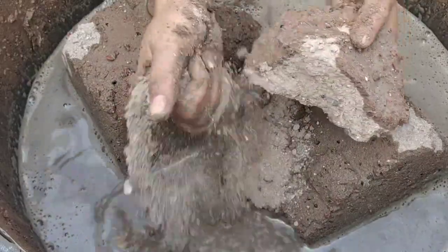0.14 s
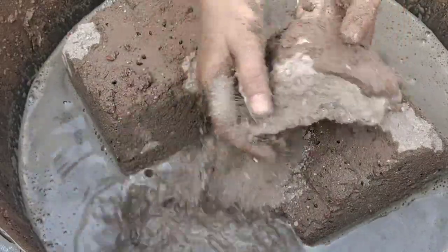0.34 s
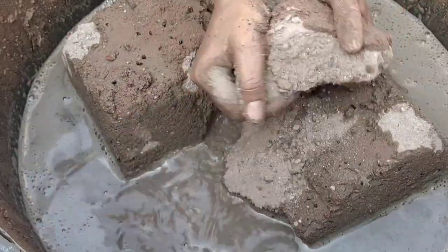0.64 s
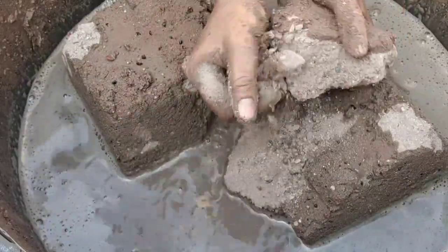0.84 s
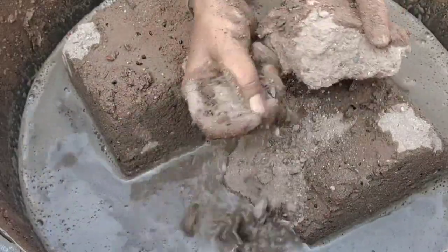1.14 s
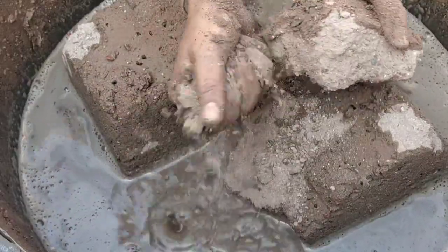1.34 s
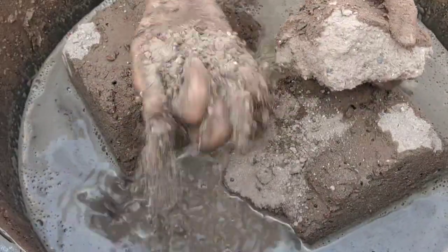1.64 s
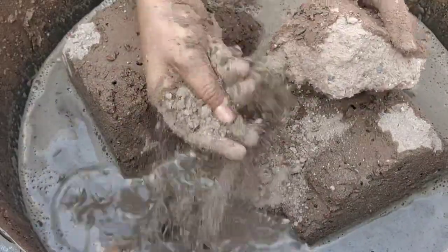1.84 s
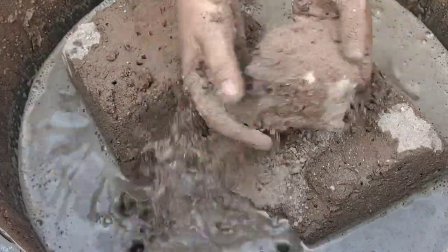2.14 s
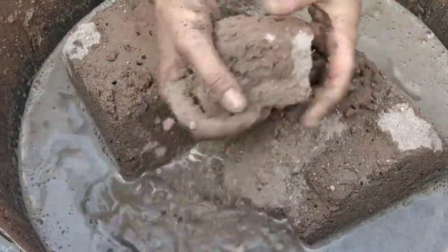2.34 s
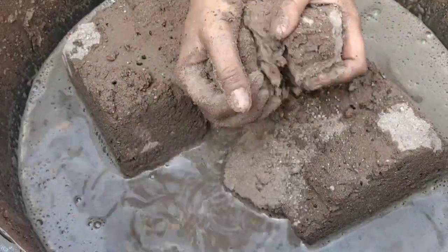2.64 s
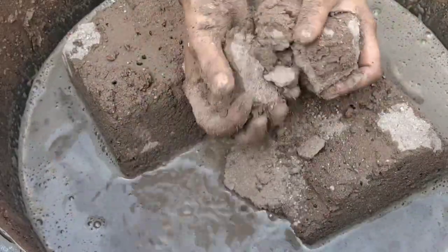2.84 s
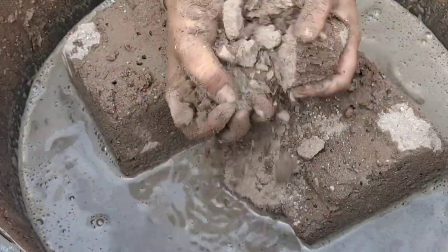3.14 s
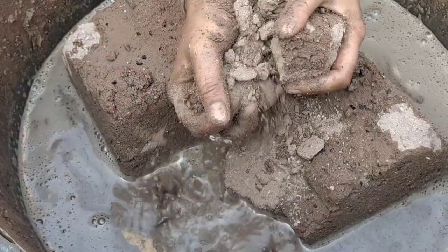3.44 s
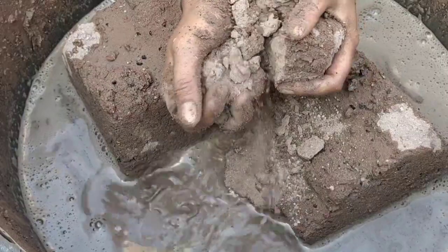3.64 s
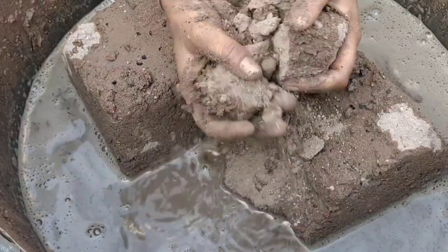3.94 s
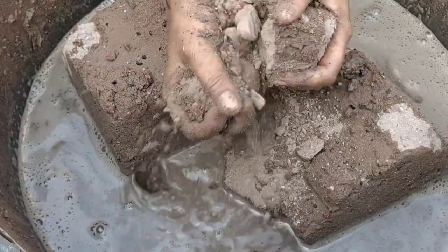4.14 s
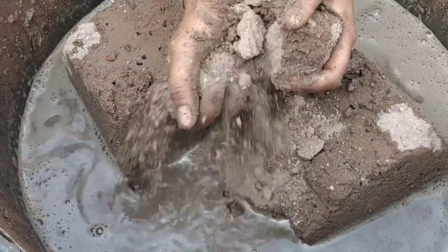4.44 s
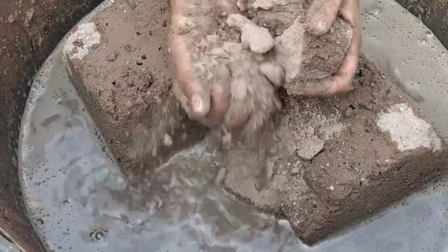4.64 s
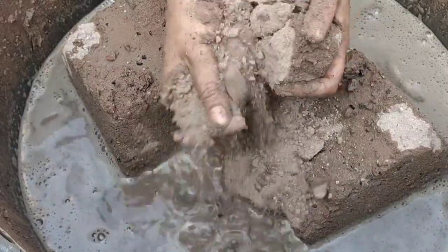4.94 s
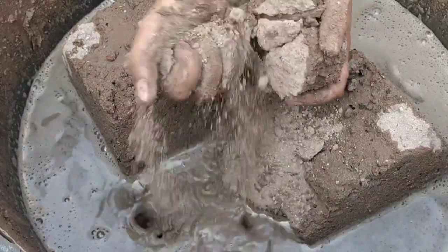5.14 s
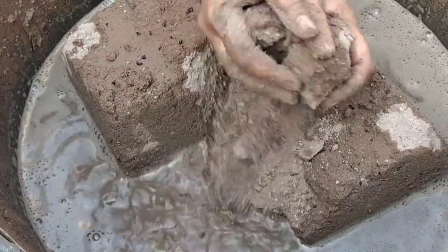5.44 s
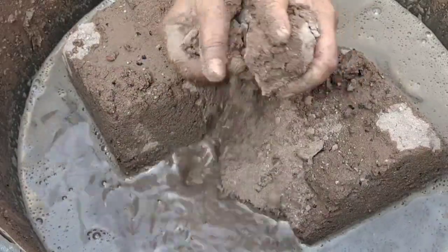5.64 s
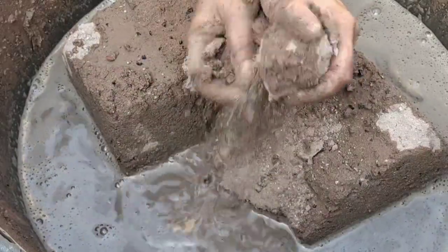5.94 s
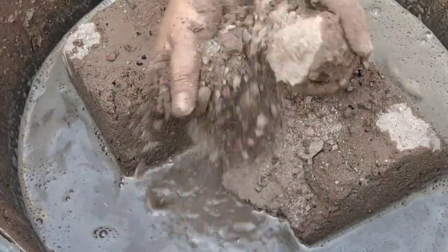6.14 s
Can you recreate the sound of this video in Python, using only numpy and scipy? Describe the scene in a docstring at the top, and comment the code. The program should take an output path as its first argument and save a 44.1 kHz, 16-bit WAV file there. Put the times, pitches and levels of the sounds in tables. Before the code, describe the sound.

Gritty squeezing comes in irregular bursts, a few per second at most, with quieter shifting of sand between. Each burst crackles, then sheds crumbs that tick, splash and bloop into a shallow tub of water. Heavier lumps knock softly around two seconds, again just after four and near five. Very close, detailed, mono outdoor sound with short boxy resonance and faint bass rumble.

```python
"""Outdoors, over a tub of muddy water, two hands crush a damp sand-cement block close to the microphone.
Squeezed sand hisses and crunches as filtered swarms of tiny impacts; grit snaps as short noise bursts.
Crumbs plop into the water as ringing bubbles, and larger lumps thud onto the soaked blocks below
as pressure pulses with spray. Resonances make the tub ring briefly after each; a low rumble lies beneath."""
import sys
import numpy as np
from scipy import signal
from scipy.fft import rfft, irfft, next_fast_len
from scipy.io import wavfile
from scipy.ndimage import map_coordinates

SR = 44100
rng = np.random.default_rng(int(sys.argv[2]) if len(sys.argv) > 2 else 0)


def put_to_file(sound):
    """Save the sound as 16-bit audio at rate SR, in the file named by the first command-line argument."""
    columns = np.atleast_2d(sound).T  # one column per channel
    safe = np.clip(columns, -1, 1)
    whole_steps = np.round(safe * 32767)
    wavfile.write(sys.argv[1], SR, whole_steps.astype(np.int16))


N = 277830

# Levels in these tables are relative: fixed offsets and the tub act on them later.
# spectrum of the low outdoor rumble: (frequency [Hz], level [dB])
AIR_SPECTRUM = [(13, -46), (22, -30), (38, -9.5), (123, 1), (142, 3), (187, -12), (254, -3), (335, -12),
                (467, -6.5), (597, -19), (700, -13.5), (910, -43), (1540, -120)]
# resonances of the hollow of the tub: (frequency [Hz], gain [dB], 60 dB decay time [s])
TUB_MODES = [(189, 1.5, 0.086), (502, 0, 0.044), (857, -2, 0.038), (1170.5, 4.5, 0.09), (1512, -8.5, 0.03)]
# handfuls raining on the water: (start [s], end [s], crumb level [dB], wet sand level [dB])
HANDFULS = [(0.0, 0.298, -23, -47), (.35, 0.499, -16.5, -41.5), (1.199, 1.619, -27, -46),
            (1.679, 1.751, -17, -45), (1.83, 1.953, -21.5, -47.5), (2.001, 2.371, -26.5, -48.5),
            (3.288, 3.679, -28.5, -55), (4.141, 4.448, -26.5, -50), (4.6, 4.72, -20, -48),
            (4.889, 5.168, -30, -48.5), (5.197, 5.304, -16, -44.5), (5.425, 5.649, -22, -46.5),
            (5.706, 6.277, -34.5, -45.5)]
# spectrum of water slapped by crumbs: (frequency [Hz], level [dB])
SPLASH_SPECTRUM = [(300, -6.5), (1200, -1.5), (3200, -2), (4800, -10.5), (14000, -18.5)]
# larger crumbs trapping a bubble: (time [s], level [dB], starting pitch [Hz], 60 dB decay time [s])
BUBBLE_CRUMBS = [(0.0448, -23.5, 1495, 0.045), (.29, -21, 1720, 0.015), (0.312, -19, 1670, 0.018),
                 (0.3355, -23.5, 1520, 0.025), (0.3661, -22, 1680, .02), (.392, -18.5, 1570, 0.027),
                 (0.4062, -22, 1073, 0.045), (0.4275, -15, 2470, 0.0046), (0.4737, -18, 2300, .006),
                 (0.505, -25, 1310, 0.017), (1.0262, -30, 1870, 0.017), (1.1215, -26, 2140, 0.016),
                 (1.1843, -11, 945, .026), (1.1956, -15.5, 1210, 0.0074), (1.2877, -16, 1530, 0.0085),
                 (1.3904, -20.5, 910, 0.011), (1.6108, -17.5, 1550, .008), (1.669, -22.5, 1305, 0.046),
                 (1.7345, -12, 1820, 0.018), (1.748, -18, 2350, 0.012), (1.8366, -23, 2800, .006),
                 (1.8504, -25, 1760, .015), (1.9124, -14.5, 2550, 0.0037), (2.1423, -16.5, 1700, .017),
                 (2.1937, -13.5, 1350, 0.0033), (2.203, -22.5, 1840, .019), (2.2327, -22, 1340, .008),
                 (2.2654, -17, 3200, 0.0071), (2.3188, -20.5, 1270, 0.026), (2.3407, -17, 1660, .006),
                 (2.3722, -9.5, 1980, 0.005), (2.656, -23.5, 1880, 0.0043), (2.7451, -21.5, 1187, 0.027),
                 (3.061, -35.5, 1610, 0.026), (3.3022, -25, 1157, .038), (3.4087, -26, 885, 0.015),
                 (3.4466, -18, 1610, 0.0053), (3.4627, -18, 1700, 0.0042), (3.5079, -16.5, 1880, 0.01),
                 (3.5596, -18, 1230, 0.01), (3.6494, -28, 1670, 0.028), (4.1602, -18, 1950, 0.0076),
                 (4.329, -19.5, 1930, 0.018), (4.4189, -13.5, 1840, 0.0068), (4.441, -32.5, 1156, 0.041),
                 (4.6494, -17, 1620, 0.0082), (4.679, -18, 3220, .004), (4.8322, -18.5, 1500, 0.006),
                 (4.911, -18, 1970, 0.015), (4.9667, -20.5, 3760, 0.014), (5.1317, -18, 1700, 0.02),
                 (5.2524, -25, 1182, .043), (5.378, -23, 840, 0.011), (5.3929, -13, 3250, 0.0044),
                 (5.4615, -18.5, 1440, .024), (5.4955, -20, 1010, .031), (5.5277, -19, 2430, 0.0043),
                 (5.5655, -20.5, 2210, 0.011), (5.5935, -26, 1490, 0.021), (5.6314, -19.5, 1850, 0.012),
                 (5.941, -20, 1170, 0.0096)]
# lumps landing, lower for a big soft lump: (time [s], level [dB], centre [Hz], splatter [dB re level])
LUMP_LANDINGS = [(1.1842, -27, 890, 6), (1.2636, -12.5, 900, -20), (1.7527, -7, 2620, -17),
                 (1.7548, -11.5, 1110, -12), (1.8741, -21, 1010, -17), (1.9405, -14, 1010, -9),
                 (1.9471, -11, 1240, -4.5), (2.0022, -16.5, 990, -7), (4.1242, -5, 714, -13),
                 (4.125, -14, 1510, -26), (4.183, -27.5, 700, 4), (4.2499, -30, 860, 9),
                 (4.989, -12, 1185, -2.5), (4.993, -19.5, 400, -2)]
# loudest grits cracking or striking: (time [s], level [dB], treble [dB re level])
LOUD_GRITS = [(.4004, -6, -28), (.443, -14, -15), (1.3264, -18, -8), (1.61, -18, -9), (1.6901, -19, -9),
              (1.7107, -14, -11), (1.7348, -20, -16), (1.7524, -14, -11), (1.8707, -15, -7.5),
              (1.9457, -11, -20), (1.9606, -19, -6), (2.003, -3, -19.5), (2.3184, -17.5, -8),
              (2.383, -9.5, -15), (2.436, -13, -22), (2.4848, -14.5, -19), (3.4005, -22, -5),
              (3.4456, -20, -9), (3.552, -16, -8), (3.585, -15.5, -10.5), (4.05, -26, -12),
              (4.4194, -22, -9), (4.566, -18, -13), (4.6082, -11, -13.5), (4.9541, -14, -12),
              (4.9889, -7.5, -18), (5.2158, -9, -17), (5.2873, -17.5, -9.5), (5.3911, -11, -21.5),
              (5.4435, -17, -6.5), (5.4932, -17, -13)]
# pockets of sand giving way in the fist: (time [s], level [dB])
COLLAPSES = [(0.097, -32), (.828, -40.5), (1.261, -30), (1.329, -32.5), (3.233, -34), (3.358, -31.5),
             (3.555, -35.5), (3.583, -30), (4.112, -36), (4.29, -32), (4.367, -27), (5.466, -31.5),
             (5.905, -31), (6.046, -35.5), (6.106, -38), (6.237, -32.5)]
# spectrum of a collapsing pocket, also used for lump spray: (frequency [Hz], level [dB])
CRUNCH_SPECTRUM = [(120, -26), (220, -1), (650, -1), (900, -4), (2000, 2), (3000, -2), (4800, 3),
                   (7500, -9.5), (10500, -10.5), (15500, -32.5)]
# the fist closing on the sand: (start [s], end [s], level [dB], swell from start to end [dB])
FIST_SQUEEZES = [(0.0, 0.268, -41.5, -3), (0.37, 0.504, -41, -3.5), (0.52, 0.72, -48, 6),
                 (0.719, 0.824, -39.5, 6), (0.957, 1.065, -50.5, -2), (1.175, 1.556, -40, -1),
                 (1.574, 1.738, -42.5, -2), (1.87, 1.947, -44, 7), (1.986, 2.088, -43, -1),
                 (2.182, 2.384, -42.5, -3), (2.621, 2.806, -46, 6), (2.92, 3.116, -52.5, -8),
                 (3.178, 3.474, -45, 0), (3.521, 3.72, -42, -3.5), (3.888, 3.99, -54, -10),
                 (4.067, 4.442, -42, -0.5), (4.474, 4.73, -43.5, 1.5), (4.855, 5.338, -44, 4),
                 (5.44, 5.645, -50, 9), (5.654, 5.739, -39, 7.5), (5.84, 6.28, -41, 5)]
# spectrum of rubbing sand: (frequency [Hz], level [dB])
SAND_SPECTRUM = [(250, -17), (900, -3.5), (2000, -11.5), (2700, -6.5), (4000, 0), (5000, 0.5), (6200, -3.5),
                 (7600, -9.5), (10600, -8.5), (13000, -14.5), (15500, -19.5)]
# spectrum of wet sand: (frequency [Hz], level [dB])
MUD_SPECTRUM = [(120, -54), (220, 0), (450, -7), (650, -5), (860, -4.5), (1400, -0.5), (2000, 5),
                (2800, -4.5), (5000, -11.5), (12000, -21.5)]

TOP_HZ = 15750  # upper band limit of the microphone
POUR_S, DRAIN_S = 0.027, 0.078  # a shower builds up; time constant as its patter dies away
STRAY_DB, CRUMB_RANGE_DB = -31, 16  # strongest stray crumb; spread of crumb levels below the strongest
# every lump slumps just after landing: delay [s], level [dB] and pitch ratio relative to the landing
SLUMP_S, SLUMP_DB, SLUMP_PITCH = 0.003045, -8, 0.438
# lesser grits: strongest level over the rubbing, spread below it, treble relative to each
GRIT_DB, GRIT_RANGE_DB, GRIT_TREBLE_DB = 19.5, 14, -11
CRUNCH_S = 0.01  # half the length of one collapse
GRIP_S, RELAX_S = 0.013, 0.027  # the fingers tighten; time constant as the rubbing dies away
HOLD_DB, HOLD_WAVER_DB = -50, 1.5  # sand shifting in the resting hands; depth of its random waver
SQUELCH_DB = -9.5  # mud pressed out between the fingers, relative to the rubbing


def amp(db):
    """Amplitude gain: twenty decibels are a factor of ten."""
    return 10 ** (np.asarray(db) / 20)


def unit(x):
    """Normalise by mean power, to rms 1."""
    return x / np.sqrt(np.mean(x ** 2) + 1e-20)


def clock(seconds):
    """Uniform sampling: the sample times [s] of a short sound."""
    return np.arange(int(seconds * SR)) / SR


def add(track, s, sound):
    """Superposition: mix a sound into the track from time s [s]."""
    start = max(round(s * SR), 0)
    part = track[start:start + len(sound)]
    part += sound[:len(part)]


def wobble(rate):
    """Random modulation: a smooth curve through Gaussian knots, rate of them a second."""
    knots = rng.standard_normal(int(N * rate / SR) + 4)
    return map_coordinates(knots, [np.arange(N) * rate / SR])


def coloured(x, points):
    """Spectral shaping: weight x by (frequency [Hz], level [dB]) points, at rms 1."""
    hz, db = np.transpose(points)
    size = next_fast_len(N + 8192)
    f = np.fft.rfftfreq(size, 1 / SR)
    gain = amp(np.interp(np.log(f + 1), np.log(hz), db, left=-80))
    return unit(irfft(rfft(x, size) * gain, size)[:N])


def bandpass(x, low_hz, high_hz):
    """Resonance: pass one band of frequencies."""
    return signal.sosfilt(signal.butter(2, [low_hz, high_hz], "band", fs=SR, output="sos"), x)


def swell(start, end, attack, release):
    """Envelope: a linear rise centred on start, a hold until end, then exponential decay."""
    t = np.arange(N) / SR
    rise = np.clip((t - start) / attack + .5, 0, 1)
    return rise * np.exp(-np.maximum(t - end, 0) / release)


def grains(per_second, spread_db, width=0.29):
    """Granular noise: tiny impacts of log-normal size ring briefly at the pitch of their size class."""
    out = np.zeros(N)
    for hz in np.geomspace(200, 15000, num=18):
        # small, high grains are the most numerous
        hits = int(per_second * (hz / 15000) ** .7 * N / SR / 6)
        where = rng.integers(0, N, hits)
        size, sign = rng.standard_normal((hits, 2)).T
        strength = np.sign(sign) * amp(spread_db * np.clip(size, -2.5, 2.5))
        impacts = np.bincount(where, strength, N)
        ringing = bandpass(impacts, hz / (1 + width / 2), hz * (1 + width / 2))
        out += unit(ringing) * np.sqrt(hz)
    return unit(out)


def bubble(hz, t60, rise=4, attack=0.00027):
    """Bubble resonance: trapped air rings, its pitch climbing as it nears the surface."""
    t = clock(.08)
    tone = np.sin(2 * np.pi * hz * t * (1 + rise * t))
    return tone * amp(-60 * t / t60) * (1 - np.exp(-t / attack))


def outdoor_air():
    """Broadband background: steady random noise weighted to the bass gives a low rumble."""
    return amp(-52.5) * coloured(rng.standard_normal(N), AIR_SPECTRUM)


def tub(x):
    """Cavity resonance: the hollow rings; the wall's short scattered tail varies through time."""
    t, ring = clock(.15), 0
    for hz, db, t60 in TUB_MODES:
        # scaled so that each mode's gain holds at its own frequency
        peak_scale = 2 * np.log(1000) / (t60 * SR)
        ring = ring + amp(db - 60 * t / t60) * np.cos(2 * np.pi * hz * t) * peak_scale
    out = x + amp(-1) * signal.fftconvolve(x, ring)[:N]
    step = SR // 8  # a new scattered tail eight times a second
    for start in range(0, N, step):
        scatter = rng.standard_normal(len(t)) * amp(-60 * t / 0.034) * (1 - np.exp(-t / 0.0015))
        scatter /= np.linalg.norm(scatter)
        add(out, start / SR, amp(-13.0) * signal.fftconvolve(x[start:start + step], scatter))
    # direct and reflected sound cancel in one narrow band
    dip_hz = 640
    return signal.lfilter(*signal.iirnotch(dip_hz, 6, SR), out)


def crumbs(start, end, db, count):
    """Random arrivals: fine crumbs as (time [s], level [dB], starting pitch [Hz], cycles of ring)."""
    fewest_cycles, extra_cycles = 12, 20  # cycles within a 60 dB decay
    return [(start + when * (end - start), db - CRUMB_RANGE_DB * size, 1450 * 2.4 ** pitch,
             fewest_cycles + extra_cycles * life)
            for when, pitch, size, life in rng.random((count, 4))]


def showers():
    """Superposed droplet impacts: each fine crumb gives a tiny splash and a short-lived bubble."""
    out, splashes, t = np.zeros(N), np.zeros(N), clock(.02)
    crumbs_per_second, splash_t60 = 80, .005
    # stray crumbs fall at any time, between the showers too
    falling = crumbs(0, N / SR, STRAY_DB, count=90)
    for start, end, db, _ in HANDFULS:
        falling += crumbs(start, end, db, count=int((end - start) * crumbs_per_second))
    for s, db, hz, cycles in falling:
        add(out, s, amp(db) * bubble(hz, t60=cycles / hz))
        add(splashes, s, amp(db - 5.5 - 60 * t / splash_t60))
    return out + splashes * coloured(rng.standard_normal(N), SPLASH_SPECTRUM)


def plops():
    """Impact and bubble resonance: each larger crumb slaps the surface and leaves a ringing bubble."""
    out, slaps, t = np.zeros(N), np.zeros(N), clock(.08)
    for s, db, hz, t60 in BUBBLE_CRUMBS:
        add(out, s, amp(db + 2.0) * bubble(hz, t60))
        add(slaps, s, amp(db - 12.0 - 60 * t / 0.017))
    return out + slaps * coloured(rng.standard_normal(N), SPLASH_SPECTRUM)


def lumps():
    """Soft impact: landing and slump each give push and recoil, a gulp and a rattle; wet sand sprays."""
    out, spray, t = np.zeros(N), np.zeros(N), clock(.1)
    lead = .003  # the push begins this long [s] before the centre of the pulse
    for landing, level_db, centre_hz, splatter_db in LUMP_LANDINGS:
        slump = (landing + SLUMP_S, level_db + SLUMP_DB, centre_hz * SLUMP_PITCH)
        for s, db, hz in [(landing, level_db, centre_hz), slump]:
            phase = 2 * np.pi * hz * (t - lead)
            push_and_recoil = phase * np.exp((1 - phase ** 2) / 2)
            add(out, s - lead, amp(db) * push_and_recoil)
            # the water cavity it opens closes one period later and rings
            add(out, s + 1 / hz, amp(db - 12) * bubble(hz, t60=0.026))
            rattle = unit(bandpass(rng.standard_normal(len(t)), hz / 2.6, min(hz * 1.8, SR / 3)))
            add(out, s, rattle * amp(db - 8.5 - 60 * t / 0.025))
        add(spray, landing, amp(level_db + splatter_db - 3.5 - 60 * t / 0.0091))
    # small lumps radiate no deep bass
    thuds = signal.sosfilt(signal.butter(3, 140, "high", fs=SR, output="sos"), out)
    return thuds + spray * coloured(rng.standard_normal(N), CRUNCH_SPECTRUM)


def lesser_grits(rub, count):
    """Stress-driven fracture: small grits crack at random moments, louder under a harder squeeze."""
    grits = []
    for when, size in rng.random((count, 2)):
        rub_db = 20 * np.log10(rub[int(when * N)])
        grits.append((when * N / SR, rub_db + GRIT_DB - GRIT_RANGE_DB * size, GRIT_TREBLE_DB))
    return grits


def snaps(rub):
    """Brittle fracture: hard grit cracks with a very short tick, each piece bright at its own pitch."""
    middle, treble, t = np.zeros(N), np.zeros(N), clock(0.063)
    for s, db, treble_db in list(LOUD_GRITS) + lesser_grits(rub, count=170):
        add(middle, s + 0.001245, amp(db - 15.5 - 60 * t / 0.017))
        hz = rng.uniform(7500, 10800)
        tick = unit(bandpass(rng.standard_normal(len(t)), hz * .75, hz * 1.25))
        tick_envelope = amp(db + treble_db + 10.5 - 60 * t / 0.0044) * (1 - np.exp(-t / 0.00056))
        add(treble, s + .0005, tick * tick_envelope)
    middle_spectrum = [(900, -6.5), (3000, 8), (5000, -1.5), (8000, -36)]  # (frequency [Hz], level [dB])
    return treble + middle * coloured(rng.standard_normal(N), middle_spectrum)


def crunches():
    """Granular collapse: a pocket gives way in a short swarm of grains under a Gaussian envelope."""
    t, force = np.arange(N) / SR, np.zeros(N)
    for s, db in COLLAPSES:
        force += amp(db) * np.exp(-((t - s) / CRUNCH_S) ** 2 * 2)
    return force * coloured(grains(14000, spread_db=1.5), CRUNCH_SPECTRUM)


def rubbing():
    """Addition of powers: each squeeze grips, tightens or eases, and lets go over a wavering hold."""
    t, power = np.arange(N) / SR, amp(HOLD_DB + HOLD_WAVER_DB * wobble(7.7)) ** 2
    for start, end, db, swell_db in FIST_SQUEEZES:
        progress = np.clip((t - start) / (end - start), 0, 1)
        squeeze = amp(db + swell_db * (progress - .5)) * swell(start, end, GRIP_S, RELAX_S)
        power += squeeze ** 2
    return np.sqrt(power)


def crumbling(rub):
    """Granular friction: grains rub in uneven slips; wet sand squelches and patters on the water."""
    pour = sum(amp(db) * swell(start, end, POUR_S, DRAIN_S) for start, end, _, db in HANDFULS)
    slips = amp(-.5 + 2.0 * wobble(90))
    sand = coloured(grains(14000, spread_db=3.5), SAND_SPECTRUM) * rub * slips
    wetness = np.hypot(pour, amp(SQUELCH_DB) * rub)
    mud = coloured(grains(7000, spread_db=4), MUD_SPECTRUM) * wetness * amp(4.1 * wobble(60))
    return sand + mud


def scene():
    """Superposition: all the crumbling sounds in the tub, over a low outdoor rumble."""
    air = outdoor_air()
    rub = rubbing()
    water = showers() + plops()
    solids = lumps() + snaps(rub) + crunches() + crumbling(rub)
    return (tub(water + solids) + air)[None]


def record(dry):
    """Band limitation: the microphone keeps nothing above its upper limit."""
    size = next_fast_len(N + 8192)
    passed = np.fft.rfftfreq(size, 1 / SR) < TOP_HZ
    return irfft(rfft(dry, size) * passed, size)[..., :N]


dry = scene()
out = record(dry)
put_to_file(out)
```